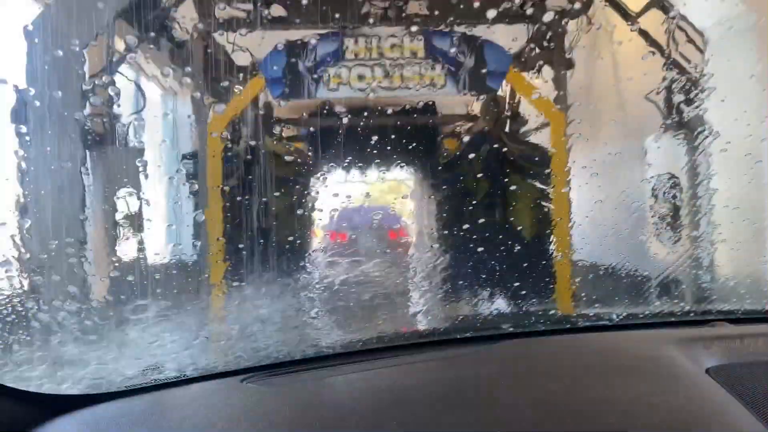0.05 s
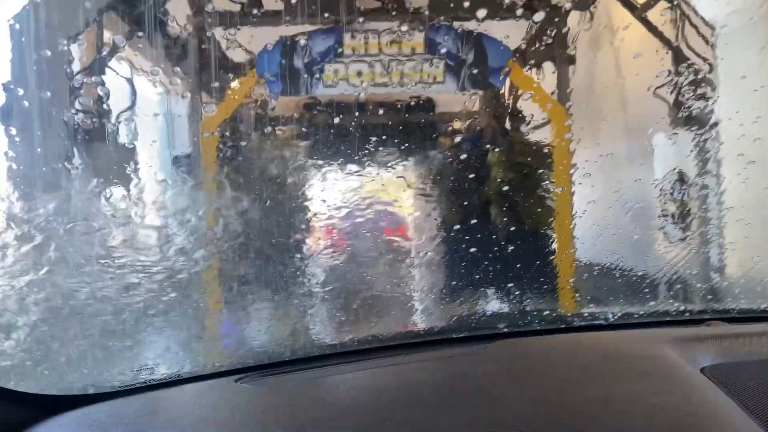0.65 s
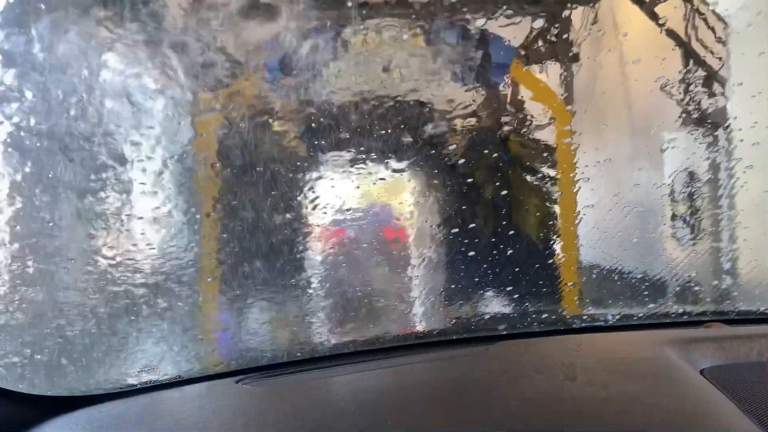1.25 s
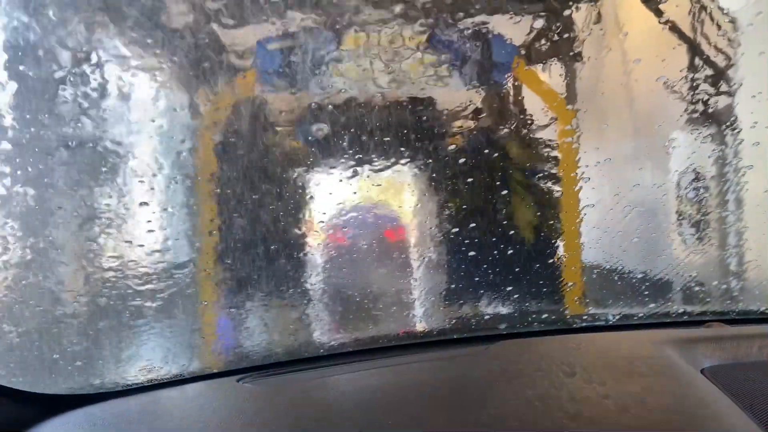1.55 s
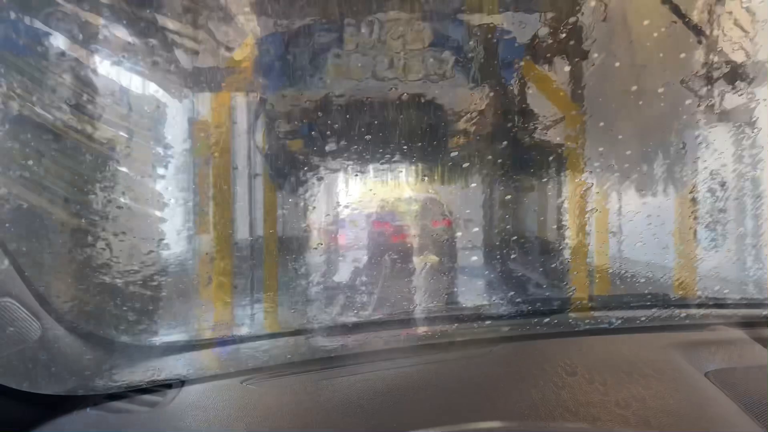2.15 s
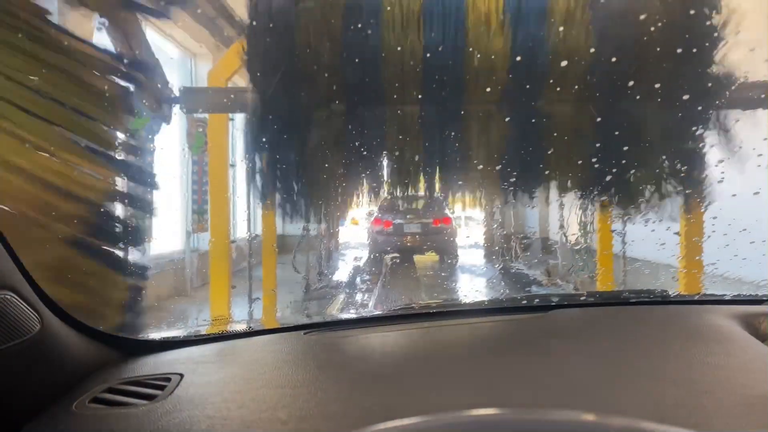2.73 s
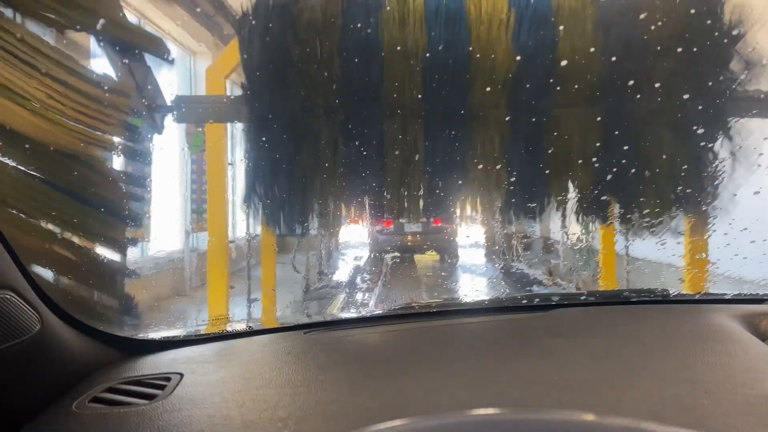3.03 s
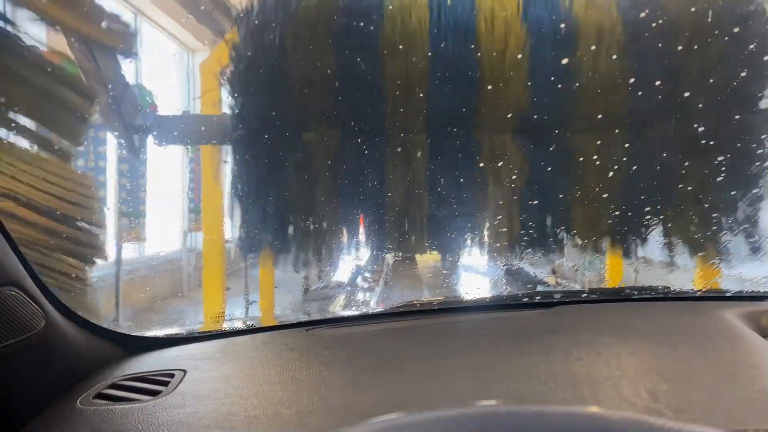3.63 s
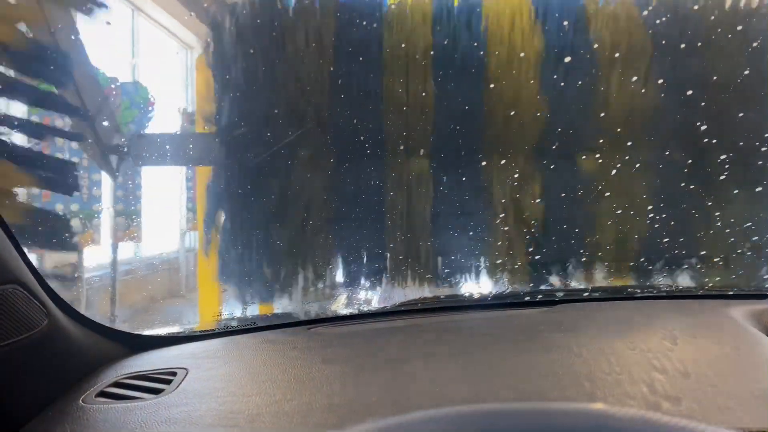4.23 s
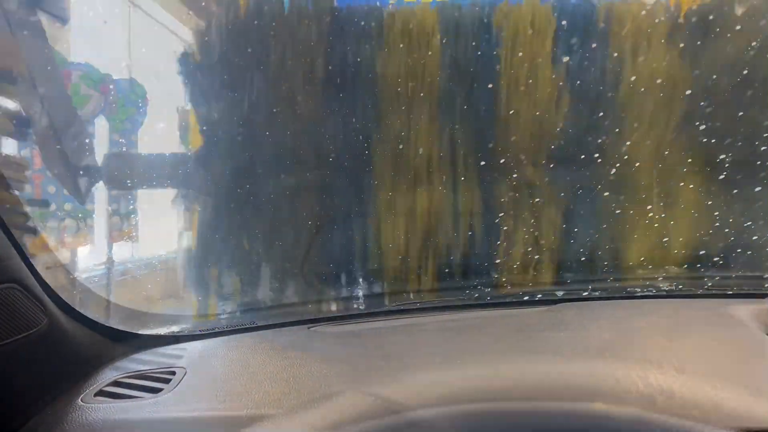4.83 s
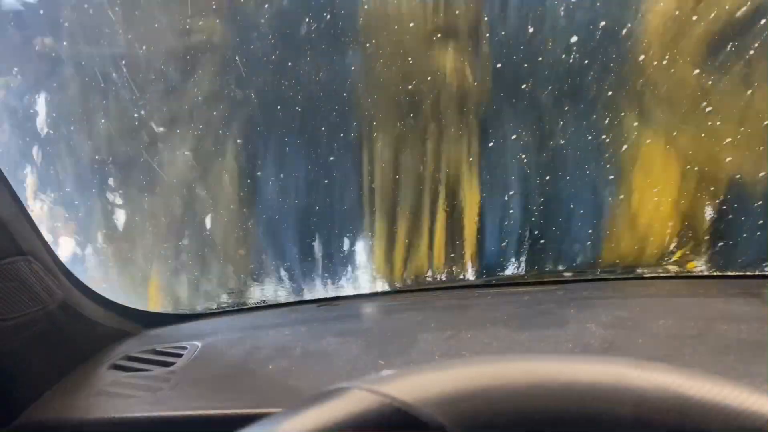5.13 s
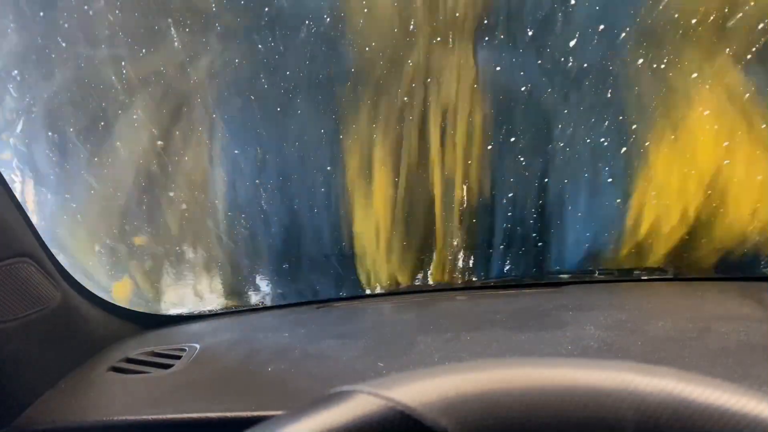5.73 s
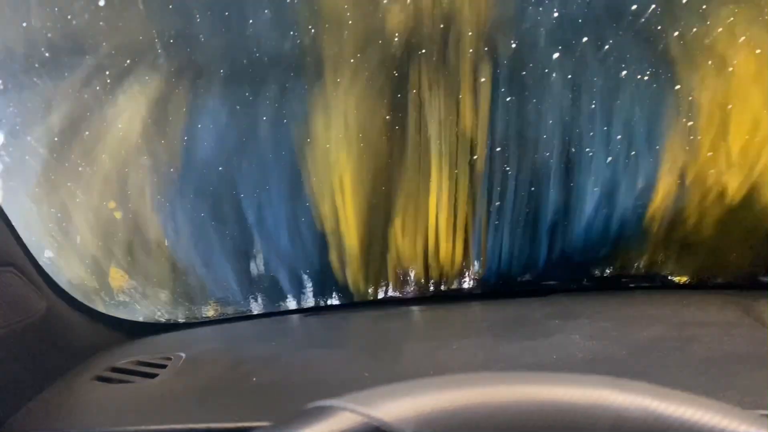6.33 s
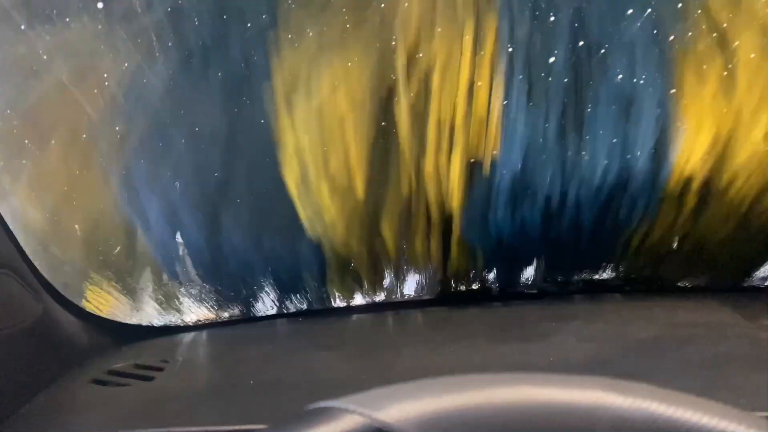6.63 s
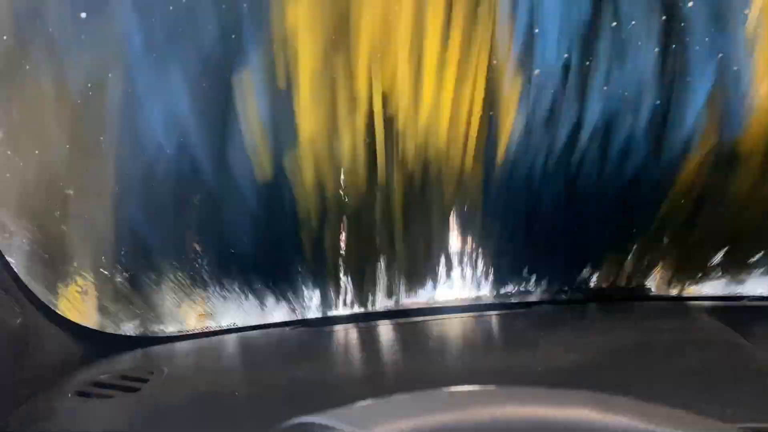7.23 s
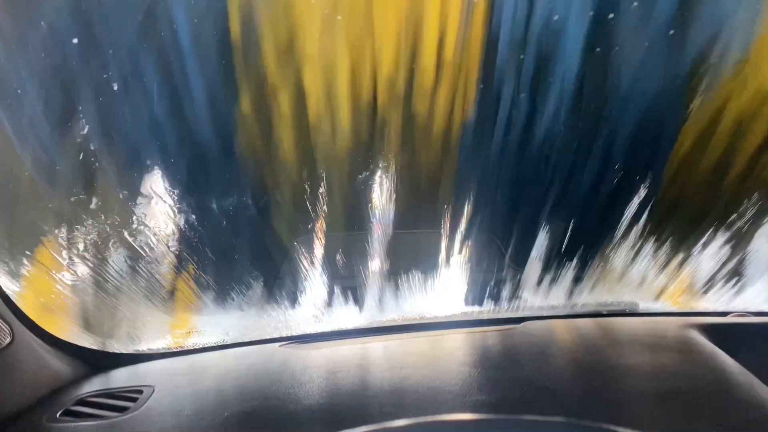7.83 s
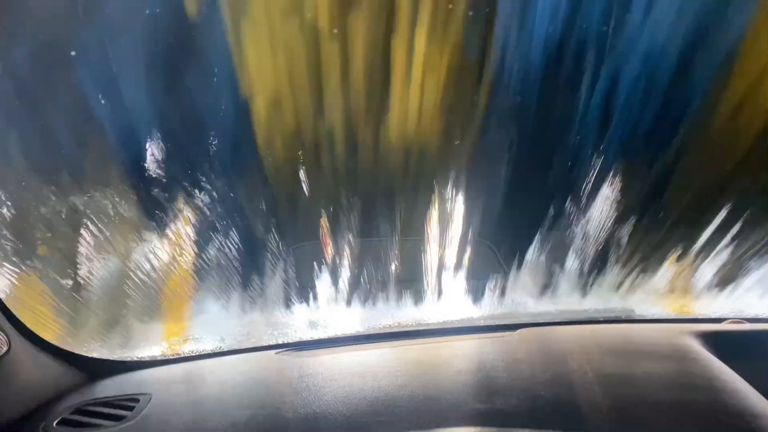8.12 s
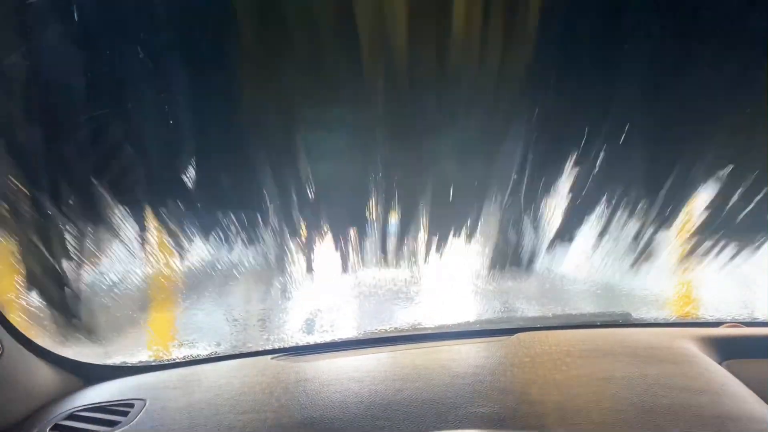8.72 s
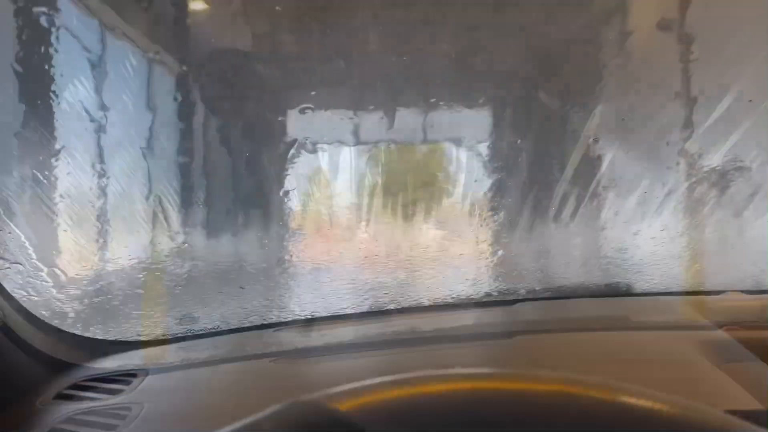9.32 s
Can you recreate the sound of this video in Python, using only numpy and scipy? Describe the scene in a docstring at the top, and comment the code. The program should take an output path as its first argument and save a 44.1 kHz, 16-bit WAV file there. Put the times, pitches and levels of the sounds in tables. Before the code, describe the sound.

Heard from a closed car, wash jets patter over a motor hum before spinning cloth brushes thump the bonnet and scrub the glass.

```python
"""Inside a closed car pulled through an automatic car wash. Pumps and motors rumble and hum through the
body. Jets spray the windscreen for two seconds and stray drops tick on the glass. Side brushes churn
along the wings and the conveyor clanks. Then the top brush drums on the bonnet and climbs the
windscreen, its wet cloth strips thumping, slapping and hissing."""
import sys
import numpy as np
from scipy import signal
from scipy.fft import rfft, irfft, next_fast_len
from scipy.io import wavfile
from scipy.ndimage import map_coordinates

SR = 44100
rng = np.random.default_rng(int(sys.argv[2]) if len(sys.argv) > 2 else 0)


def wav_record(signal):
    """Record a signal, one row per channel, as 16-bit PCM in the file named by sys.argv[1]."""
    frames = np.transpose(np.atleast_2d(signal))
    bounded = np.clip(frames, -1, 1)
    # unit amplitude maps onto the largest positive 16-bit level
    quanta = np.round(bounded * 32767).astype(np.int16)
    wavfile.write(sys.argv[1], SR, quanta)


N = 417627

# The level dips briefly (a negative dip is a lift): middle_s, half_length_s, rumble_dip_db, wash_dip_db
LULLS = [(1.7, 0.46, 1.5, -1.5), (2.198, 0.45, 3.5, 3.5), (4.815, 0.2, 1.5, 1.5)]
# A "tone" lists how strong each pitch is in a sound.
# The bonnet's dull thump: pitch_hz, level_db
THUMP_TONE = [(30, -36), (70, -8), (100, -0.1), (125, 1.5), (165, -1.3), (210, -9), (255, -11.5),
              (300, -12), (400, -8.5), (480, -17), (1100, -40)]
# The ring of the bonnet's metal sheet: pitch_hz, level_db
RING_TONE = [(60, -38), (195, -9.5), (238, -3.5), (264, 1), (295, -9), (350, -3.5), (420, -21),
             (520, -33.5), (900, -42.5)]
# The deep boom of the whole car body: pitch_hz, level_db
BOOM_TONE = [(10, -52.5), (22, -23), (38, -12), (50, -8.5), (66, 4.5), (90, 2.5), (130, -26.5),
             (300, -40.5)]


def amp(db):
    """Turn decibels into a number to multiply a sound by."""
    return 10 ** (np.asarray(db) / 20)


def unit(x):
    """Scale a sound to an average strength (rms) of 1."""
    return x / np.sqrt(np.mean(x ** 2) + 1e-20)


def along(points, hz):
    """Read between the rows of a (pitch_hz, value) table, with octaves evenly spaced."""
    pitches, values = np.transpose(points)
    return np.interp(np.log(hz + 1), np.log(pitches + 1), values)


def wobble(rate):
    """A smooth random curve through `rate` points a second."""
    points = rng.standard_normal(int(N * rate / SR) + 4)
    return map_coordinates(points, [np.arange(N) * rate / SR])


def turns(hz, drift_hz, rate):
    """The angle of a shaft whose speed wanders."""
    return 2 * np.pi * (np.cumsum(hz + drift_hz * wobble(rate)) / SR + rng.random())


def cycle(hz, drift_hz, rate):
    """A sine wave whose speed wanders."""
    return np.sin(turns(hz, drift_hz, rate))


def passing(full_s, leave_s, rise_db_per_s, fall_db_per_s):
    """The level in dB (0 at most) of something that nears until full_s and recedes from leave_s."""
    t = np.arange(N) / SR
    return -rise_db_per_s * np.maximum(full_s - t, 0) - fall_db_per_s * np.maximum(t - leave_s, 0)


def swell(middle_s, half_length_s):
    """A smooth hump of height 1 around a moment."""
    return np.exp(-((np.arange(N) / SR - middle_s) / half_length_s) ** 2)


def filtered(x, response):
    """Change the strength and phase of each pitch in x by response(hz)."""
    size = next_fast_len(N + SR // 2)
    return irfft(rfft(x, size) * response(np.fft.rfftfreq(size, 1 / SR)), size)[..., :N]


def body(x, tone, size=8192):
    """Ring x through a panel with this tone; pitches above the last row fade steeply."""
    hz = np.fft.rfftfreq(size, 1 / SR)
    gain = amp(along(tone, hz)) / np.maximum(1, hz / tone[-1][0]) ** 6
    cepstrum = irfft(np.log(gain + 1e-6))[:size // 2]  # keeping half puts the ring after the hit
    cepstrum[1:] *= 2
    ring = irfft(np.exp(rfft(cepstrum, size)))
    return signal.fftconvolve(x, ring[None], axes=1)[:, :N]


def shaped(x, tone):
    """Give x a tone and a strength of 1."""
    return unit(body(x, tone))


def noise():
    """Two unrelated hisses of white noise."""
    return rng.standard_normal((2, N))


def impacts(rate, spread_db):
    """Two streams of random taps of uneven size, each with about `rate` a second."""
    hit = rng.random((2, N)) < rate / SR
    size = amp(spread_db * np.clip(rng.standard_normal((2, N)), -2.5, 2.5))
    return unit(hit * size * rng.choice([-1, 1], (2, N)))


def plops(rate, hz, octaves, cycles, samples):
    """Two streams of small splashes, each ringing briefly at its own pitch within `octaves` of hz."""
    count = int(rate * N / SR)
    when, side, pitch, strength = rng.random((count, 4)).T
    pitch_hz = hz * 2 ** (octaves * (2 * pitch[:, None] - 1))
    phase = pitch_hz * np.arange(samples) / SR
    rings = amp(12 * strength[:, None] ** 2) * np.sin(2 * np.pi * phase) * np.exp(-phase / cycles)
    start = (when * (N - samples)).astype(int) + N * (side > .5)
    places = start[:, None] + np.arange(samples)
    return unit(np.bincount(places.ravel(), rings.ravel(), 2 * N).reshape(2, N))


def struck(hits, notes):
    """Each hit rings an object's own notes, slightly out of tune; they fall 60 dB in fade_s."""
    out, t = np.zeros((2, N + SR)), np.arange(SR // 5) / SR
    attack = 1 - np.exp(-t / .0005)
    for start_s, db, *_ in hits:
        for hz, note_db, fade_s in notes:
            phase = 2 * np.pi * (hz * rng.normal(1, .012) * t + rng.random((2, 1)))
            note = amp(db + note_db - 60 * t / fade_s) * attack * np.sin(phase)
            out[:, round(start_s * SR):][:, :len(t)] += note
    return out[:, :N]


def splashes(hits, fade_s, tail, low, high):
    """Wet hits: noise from low to high times each pitch, with a faint tail of scattered water."""
    out, t = np.zeros((2, N + SR)), np.arange(SR // 10) / SR
    burst = (1 - np.exp(-t / .00043)) * (amp(-60 * t / fade_s) + tail * amp(-60 * t / .14))
    for start_s, db, hz in hits:
        band = signal.butter(3, [low * hz, min(high * hz, .45 * SR)], "band", fs=SR, output="sos")
        splash = signal.sosfilt(band, rng.standard_normal((2, len(t))) * burst)
        out[:, round(start_s * SR):][:, :len(t)] += amp(db) * splash / np.abs(splash).max()
    return out[:, :N]


def machinery():
    """Pumps shake the car body; three brush motors hum above them, louder under load."""
    # The rumble in the cabin: pitch_hz, level_db
    rumble_tone = [(10, -49), (22, -28.5), (40, -8), (60, -3.5), (95, -7.5), (135, -1), (175, -5),
                   (220, -13.5), (290, -9.5), (410, -8), (490, -18.5), (900, -46)]
    # The pump's hum: multiple_of_shaft_speed, level_db
    pump_notes = [(1, -20), (2, 1.5), (3, -14), (4, -14.5), (7, -16.5), (9, -33)]
    # The pump surges: middle_s, lift_db
    surges = [(.5, 10), (.88, 8), (1.52, 12.5), (1.98, 9), (2.74, 12.5), (3.3, 3.5), (3.75, 7)]
    # The brush motors: pitch_hz, drift_hz, idle_db
    motors = [(340.4, 3.21, -43), (376, 2.17, -45.5), (406, 2.6, -49)]
    # The motors strain: middle_s, half_length_s, first_lift_db, second_lift_db, third_lift_db
    strains = [(.27, 0.49, 12.5, 9, -0.5), (1.2, 0.46, 7, -9, -6.5), (2.42, 0.26, 8.5, 3.5, 8),
               (2.76, 0.17, 0, -2, 10), (3.13, 0.41, 10.5, 3.5, 1), (3.72, 0.35, 0.5, 10, 7),
               (4.16, 0.27, 11, -2, -1.5), (4.3, 0.4, -0.5, 15, -0.5), (5.15, 0.67, 7.5, 6, 10.5)]
    lull_db = sum(db * swell(s, length) for s, length, db, _ in LULLS)
    pump_db = -39 + sum(db * swell(s, half_length_s=.24) for s, db in surges)
    load_dbs = sum(np.outer(dbs, swell(s, length)) for s, length, *dbs in strains)
    rumble = amp(-25 - lull_db) * shaped(noise(), rumble_tone)
    shaft = turns(hz=59.2, drift_hz=.7, rate=11)
    pump = sum(amp(pump_db + db + 1.3 * wobble(12)) * unit(np.sin(k * shaft)) for k, db in pump_notes)
    hum = sum(amp(idle_db + load_db + 1.83 * wobble(16)) * unit(cycle(hz, drift_hz, rate=24))
              for (hz, drift_hz, idle_db), load_db in zip(motors, load_dbs))
    return rumble + (pump + hum) * np.array([[1], [0]])  # both microphones share the hum


def wash_and_side_brushes():
    """Water rushes in the tunnel and flutters as the side brushes churn along the wings and beat them."""
    # The rushing water: pitch_hz, level_db
    wash_tone = [(300, -29), (520, -3.5), (750, -3.5), (1000, -7.5), (1500, -15.5), (2000, -19.5),
                 (2500, -21), (3800, -25), (5500, -33), (8000, -48), (12000, -62), (15500, -83.5)]
    touch = np.maximum(amp(passing(3.07, 4.2, 12, 5.3)), .25)
    lull_db = sum(db * swell(s, length) for s, length, _, db in LULLS)
    flutter_db = touch * (.8 * cycle(7.5, 1.8, rate=3) + cycle(38, 3, rate=3) + .7 * wobble(60))
    water = noise() + .45 * impacts(1500, spread_db=5)
    wash = amp(-40 - lull_db + flutter_db) * shaped(water, wash_tone)
    boom = amp(-39 + heave()) * shaped(impacts(180, spread_db=-1), BOOM_TONE)
    drum = amp(-28.5) * shaped(impacts(500, spread_db=2.5), THUMP_TONE)
    churn_db = -44 + passing(2.3, 6.2, 22, 7.3) + flutter_db
    churn = amp(churn_db) * plops(700, hz=664, octaves=.6, cycles=4.3, samples=750)
    return wash + churn + touch ** 2 * (boom + drum)


def spray():
    """Fine drops from the jets patter on the glass and ring it; later the top brush flings water too."""
    # The jets' patter: pitch_hz, level_db
    jet_tone = [(600, -32), (1500, -18), (2000, -0.5), (2400, -2.5), (3300, -8), (4300, -5), (5300, -6.5),
                (7000, -9.5), (9500, -10), (12000, -22), (14000, -25.5), (16000, -39.5)]
    # The glass, ringing most while the jets hit its foot: pitch_hz, level_db
    glass_tone = [(1500, -33.5), (2050, -8), (2330, 2), (2480, -7.5), (2620, -6), (2900, -28.5)]
    # The finest drops: pitch_hz, level_db
    mist_tone = [(4000, -28), (6500, -8.5), (10500, 0), (12500, -1), (16000, -27)]
    # The duller fizz of coarse water flung by the brush: pitch_hz, level_db
    fizz_tone = [(2000, -25), (4800, -0.5), (6200, -4.5), (7500, -8.5), (9500, -11.5), (11500, -18.5),
                 (13500, -26.5), (15500, -45)]
    splutter = amp(1.2 * wobble(25) + .4 * wobble(9))
    fat_drops = .25 * impacts(35, spread_db=4)
    fine_drops = impacts(1600, spread_db=4.5) + .9 * noise() + fat_drops
    jets = amp(-49.5 + passing(.33, 1.6, 13, 19)) * shaped(fine_drops, jet_tone)
    ring = amp(-56.5 + passing(0, -1, 0, 5)) * shaped(noise(), glass_tone)
    finest_drops = impacts(1500, spread_db=4.5) + .5 * noise()
    from_jets = amp(-58.5 + passing(1.3, 1.8, 7, 28))
    from_brush = amp(-65 + passing(6.4, 16, 20, 20))
    mist = (from_jets + from_brush) * shaped(finest_drops, mist_tone)
    flung_drops = impacts(1800, spread_db=3.5) + .65 * noise() + fat_drops
    fizz = amp(-37.5 + 1.3 * effort() - .45 * gaps()) * shaped(flung_drops, fizz_tone)
    return ring + splutter * (jets + mist + fizz)


def thuds():
    """A bunch of cloth strips lands at once, thumps the body and rings the bonnet."""
    # Heavy blows: start_s, thump_db, ring_db
    blows = [(0.131, -19, -42), (0.917, -19, -42), (1.209, -23, -43), (3.66, -21, -30), (3.718, -16.5, -26),
             (4.483, -17.5, -29), (4.529, -20, -31), (5.434, -28.5, -35), (6.385, -8, -28),
             (6.585, -10, -14), (6.7, -15, -25.5), (6.815, -17, -10), (7.078, -11.5, -20),
             (7.144, -15.5, -10), (7.214, -11, -11), (7.307, -7.5, -23), (7.573, -18, -7),
             (7.615, -13.5, -23), (7.71, -10.5, -11), (7.982, -12, -25), (8.17, -14.5, -10),
             (8.547, -22, -20), (8.625, -10, -28)]
    out, click = np.zeros((2, N + SR)), np.eye(1, SR // 8)
    thump, ring = (body(click, tone)[0] for tone in (THUMP_TONE, RING_TONE))
    for start_s, thump_db, ring_db in blows:
        blow = amp(thump_db) * thump / np.abs(thump).max() + amp(ring_db) * ring / np.abs(ring).max()
        out[0, round(start_s * SR):][:len(blow)] += blow
    return out[:, :N]


def ticks():
    """Single drops and strip tips hit the glass, short and bright, and ring it."""
    # The hits: start_s, level_db, pitch_hz
    drops = [(0.3217, -44, 4000), (0.7861, -41.5, 5600), (2.506, -52, 5860), (3.3503, -55, 3970),
             (3.4944, -52, 4600), (3.9938, -47.5, 3840), (4.1375, -47, 3400), (4.154, -55, 7000),
             (4.1644, -51, 6030), (4.504, -43.5, 4170), (4.6134, -52, 5000), (4.682, -48, 5200),
             (4.7047, -46, 4570), (4.8015, -46, 3280), (5.1038, -48.5, 4520), (6.266, -46.5, 7440),
             (7.516, -37, 5570), (7.7707, -34, 4800), (7.79, -37.5, 7960), (8.176, -30, 6100)]
    # The notes of the glass: pitch_hz, level_db, fade_s
    glass_notes = [(3570, 0.5, .035), (5800, -6.5, 0.055)]
    return amp(5.5) * splashes(drops, fade_s=.024, tail=.2, low=.6, high=1.6) + struck(drops, glass_notes)


def heave():
    """The lift in dB of the boom while a brush's weight presses on the body."""
    # The pushes: middle_s, lift_db
    pushes = [(3.2, 9), (3.4, 5.5), (3.68, 9.5), (5.17, 7.5), (5.45, 6.5), (6.22, 4.5), (6.52, 1.5),
              (6.82, 1.5), (7.2, 6), (7.68, 11), (8.07, 5), (8.36, 9.5), (8.6, 8), (8.98, 11)]
    return sum(db * swell(s, half_length_s=.11) for s, db in pushes)


def conveyor():
    """The conveyor clanks and its steel rings."""
    # The clanks: start_s, level_db
    clanks = [(3.494, -42), (3.512, -37.5), (3.676, -42)]
    # The notes of the steel: pitch_hz, level_db, fade_s
    steel_notes = [(746, -1, 0.17), (906, 4, 0.11), (1270, -4, 0.15), (1750, -5, .12), (2230, -12, .1)]
    return struck(clanks, steel_notes)


def slaps():
    """Single wet strips slap the car, lower and longer than a drop; the first row gives the conveyor's clank
    its body."""
    # The slaps (the first is the body of the conveyor's clank at 3.5 s): start_s, level_db, pitch_hz
    strips = [(3.512, -23.5, 900), (4.138, -26, 2000), (5.533, -30, 1000), (5.618, -27, 1000),
              (7.513, -36, 795), (8.501, -17, 900)]
    return amp(-6) * splashes(strips, fade_s=.048, tail=.25, low=.63, high=1.46)


def gaps():
    """The dip in dB while the strips lift off the car."""
    # The lift-offs: middle_s, half_length_s, dip_db
    lift_offs = [(6.174, 0.012, 3.5), (6.487, 0.019, 2), (7.768, 0.0093, 4.5), (8.293, 0.0061, 2),
                 (8.411, 0.014, 7), (9.067, 0.062, 3.5)]
    return sum(db * swell(s, length) for s, length, db in lift_offs)


def contact():
    """How much of the top brush lies on the car, from 0 to 1."""
    touch_s, settle_s = 4.84, .61
    return np.clip((np.arange(N) / SR - touch_s) / settle_s, 0, 1) * amp(-gaps())


def brush_on_bonnet():
    """The top brush scuffs the car's nose, then beats the bonnet like a drum and shakes the body."""
    # Strips hit the bonnet's centre, where it rings most: middle_s, half_length_s, lift_db
    centre_hits = [(6.06, 0.032, 10), (6.291, 0.12, 6.5), (6.44, 0.024, 8.5), (6.611, .035, 8.5),
                   (6.8, 0.083, 11.5), (6.969, 0.053, 7.5), (7.185, 0.046, 4.5), (7.283, 0.034, 5.5),
                   (7.442, 0.096, 11.5), (7.562, 0.071, 3.5), (8.15, 0.071, 2), (8.513, 0.054, 6),
                   (8.678, 0.083, 4), (8.884, .08, 8)]
    centre_db = sum(db * swell(s, length) for s, length, db in centre_hits)
    near_db, heave_db = passing(7.03, 8.12, 4.7, 4.6), heave()
    boom_db = -26 + passing(6.5, 6.9, 1.8, 5.1) + heave_db
    boom = amp(boom_db) * shaped(impacts(400, spread_db=2), BOOM_TONE)
    drum_db = -18 + near_db + .11 * heave_db + .1 * centre_db
    drum = amp(drum_db) * shaped(impacts(700, spread_db=3.5), THUMP_TONE)
    ring = amp(-28 + near_db + centre_db) * shaped(impacts(400, spread_db=5.5), RING_TONE)
    scuff_db = -33 + passing(5.6, 5.9, 8.8, 3)
    scuff = amp(scuff_db) * plops(300, hz=484.5, octaves=.35, cycles=5.5, samples=2048)
    return contact() * (boom + drum + ring + scuff)


def effort():
    """How hard the strips sweep the windscreen, in dB; 0 is the hardest."""
    # The sweep: time_s, effort_db
    sweep = [(5.8, -71.5), (6.11, -56), (6.52, -56.5), (7.22, -48.5), (7.47, -50.5), (7.74, -49.5),
             (8.0, -44), (8.6, -41.5), (8.92, -42.5), (9.47, -51)]
    time_s, effort_db = np.transpose(sweep)
    sweep_db = np.interp(np.arange(N) / SR, time_s, effort_db)
    return sweep_db - sweep_db.max()


def brush_on_windscreen():
    """Rows of wet strips rub, swish, splash and flick the glass, and cup air hollowly at its top."""
    # Cloth scrubbing the glass: pitch_hz, level_db
    rub_tone = [(250, -25.5), (430, -2.5), (600, 2), (760, -2.5), (950, -4.5), (1300, -11), (2800, -26.5)]
    # The wet swish: pitch_hz, level_db
    swish_tone = [(700, -38.5), (1300, 0.1), (1700, -3.5), (2100, -4), (2500, -3), (3200, -5), (4100, -5),
                  (5000, -7), (6500, -17), (9000, -23), (16000, -48)]
    # Strip tips flicking the glass: pitch_hz, level_db
    tip_tone = [(1500, -33), (2350, -1), (3100, -4), (3600, -2), (4000, 5), (4400, -4), (5500, -18)]
    rows = cycle(hz=18.5, drift_hz=1.4, rate=6.2)  # one row of strips lands after another
    slap_db = 1.25 * rows + .65 * wobble(60) + .2 * wobble(12)
    rub_db = -28 + passing(8.63, 8.8, 3.33, 3.5) + .47 * rows + 1.2 * wobble(35)
    rub = amp(rub_db) * shaped(impacts(2500, spread_db=.5), rub_tone)
    hollow_db = -29.5 + passing(8.45, 8.25, 17, 6.1)
    hollow = amp(hollow_db) * plops(130, hz=813, octaves=.452, cycles=15, samples=2048)
    swish = shaped(impacts(5000, spread_db=2.5) + noise(), swish_tone)
    splash = amp(-6) * plops(800, hz=2913, octaves=.753, cycles=12, samples=900)
    flick = amp(-12.5) + amp(-7 + passing(7.1, 7.33, 14, 23))  # most over the middle of the bonnet
    tips = flick * shaped(impacts(260, spread_db=2.8), tip_tone)
    sweep_db = -32.5 + .78 * effort() + slap_db
    return contact() * (rub + hollow + amp(sweep_db) * (swish + splash + tips))


def smacks():
    """A soaked row of strips lands flat on the glass in a dense cluster of splashes."""
    # The landings: middle_s, level_db
    landings = [(7.162, -44.5), (7.622, -33.5), (7.675, -32), (7.716, -34), (7.78, -30.5), (7.952, -29.5),
                (7.997, -30.5), (8.27, -36), (8.56, -38), (8.66, -40)]
    loudness = sum(amp(db) * swell(s, half_length_s=.015) for s, db in landings)
    return loudness * plops(4000, hz=1920, octaves=.8, cycles=7.4, samples=300)


def scene():
    """The cabin colours all sounds. Their first row is shared by left and right; the second differs."""
    # Pitches that the glass and cabin boost: pitch_hz, width_hz, lift_db
    resonances = [(721, 80, 3), (909, 28, 0.5), (1343, 89, 5), (1606, 170, 4), (1830, 100, 3),
                  (2264, 61, 3), (2410, 44, 3.5), (2625, 68, 2), (3040, 300, 0.4), (3690, 110, 2.5)]
    # How alike left and right are: pitch_hz, likeness (1 or more means the same)
    likeness = [(60, 1.2), (150, 0.8), (380, 0.64), (600, 0.38), (900, 0), (1400, 0.5), (2000, 0),
                (2600, 0.37), (4100, 0.53), (5400, 0), (6700, .92), (12000, 9)]

    def cabin(hz):
        """The strength of the shared part and the differing part at each pitch."""
        lift_db = sum(db / (1 + (2 * (hz - centre) / width) ** 2) for centre, width, db in resonances)
        angle = np.arccos(np.clip(along(likeness, hz), 0, 1)) / 2
        return amp(lift_db - 1.02) * np.array([np.cos(angle), np.sin(angle)])

    mix = machinery() + conveyor() + wash_and_side_brushes() + spray()
    mix = mix + brush_on_bonnet() + brush_on_windscreen() + smacks() + thuds() + ticks() + slaps()
    shared, apart = filtered(mix, cabin)
    return np.array([shared + apart, shared - apart])


def record(dry):
    """Two microphones differ in level and phase, and pick up nothing above top_hz."""
    # How much louder the left is: pitch_hz, left_minus_right_db
    balance = [(30, 1.8), (110, 3.4), (260, 0.42), (500, 2.5), (1500, 0.83), (8000, 0.068)]
    # How far the left wave is ahead (negative is behind): pitch_hz, lead_radians
    lead = [(100, 0), (650, -.5), (1150, -3), (1700, -2.9), (2350, 0), (2700, .7), (3600, 0), (4500, 0),
            (5400, -3.1), (6200, -6), (7400, -6.4), (8700, -9.1), (9500, -9.7), (10400, -12.2),
            (11700, -12.9), (12700, -15.4), (13700, -16), (14700, -18.8)]
    top_hz = 15700
    half = np.array([[.5], [-.5]])  # each side takes half, in opposite directions
    return filtered(dry, lambda hz: amp(half * along(balance, hz))
                    * np.exp(1j * half * along(lead, hz)) * (hz < top_hz))


dry = scene()
out = record(dry)
wav_record(out)
```